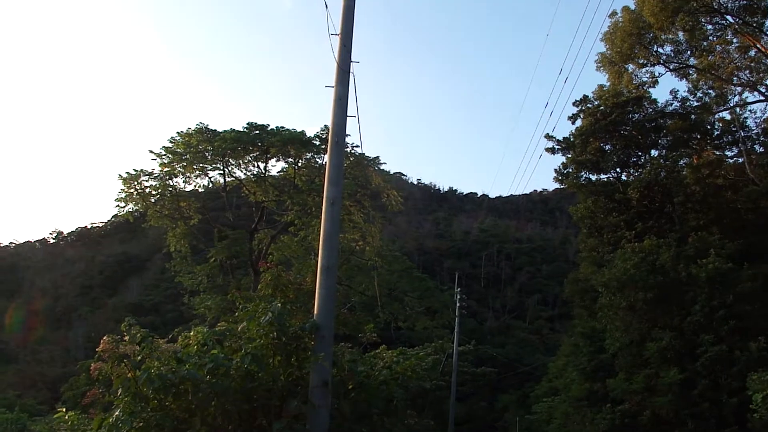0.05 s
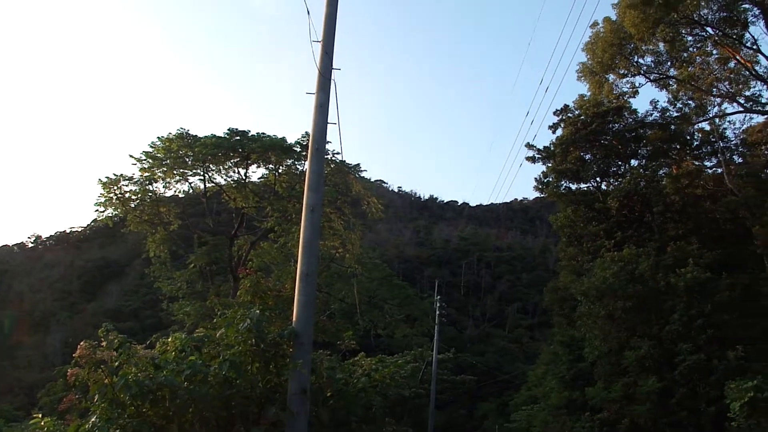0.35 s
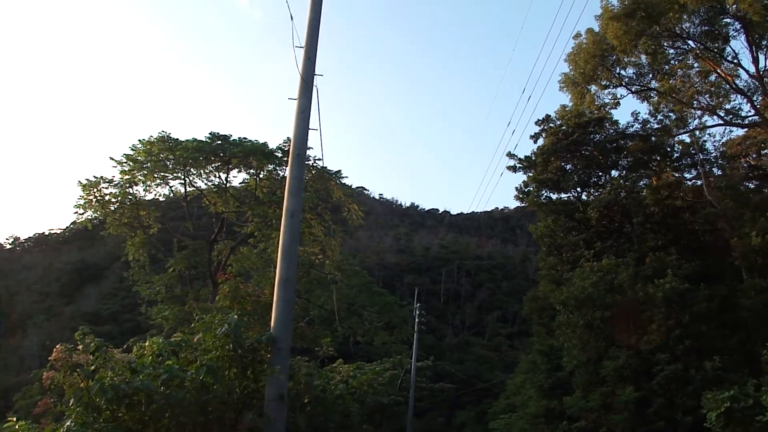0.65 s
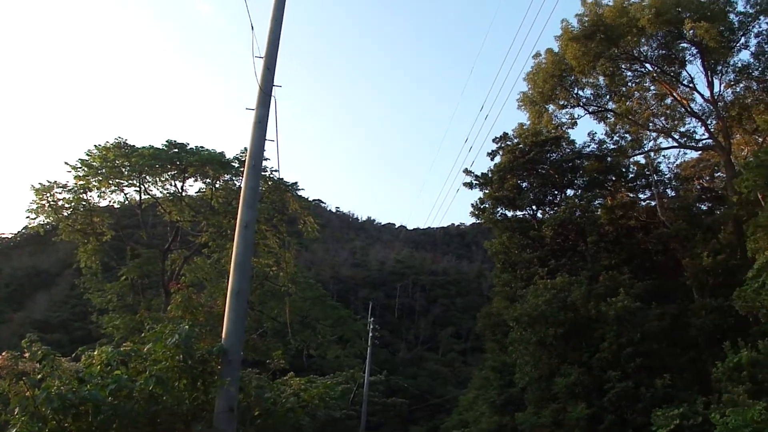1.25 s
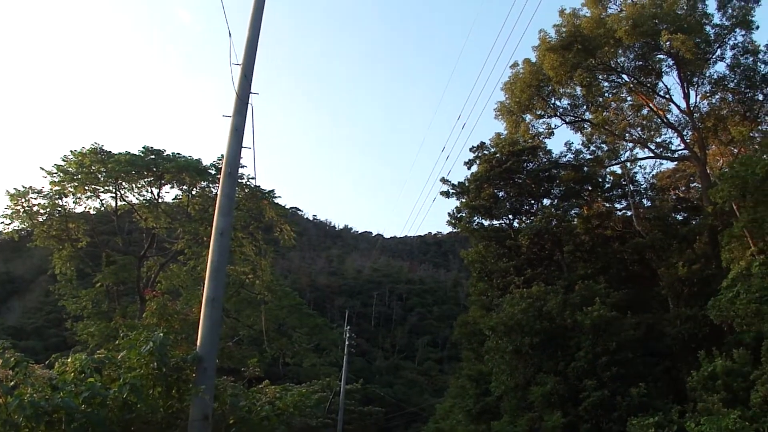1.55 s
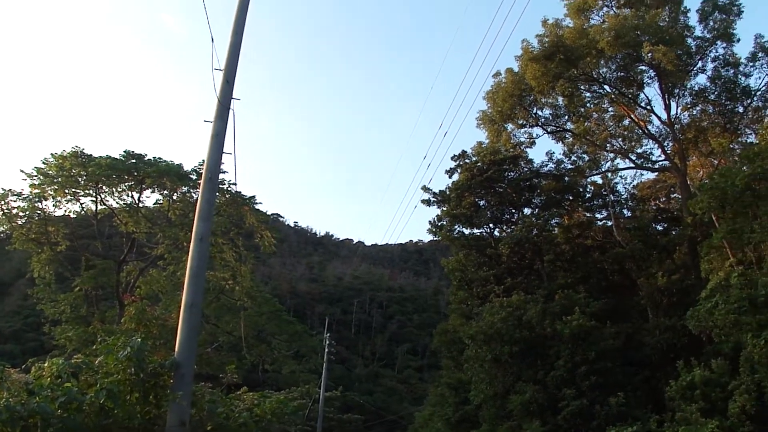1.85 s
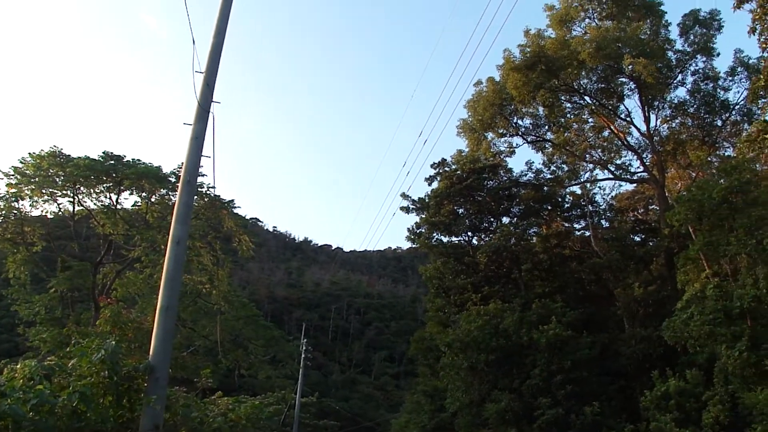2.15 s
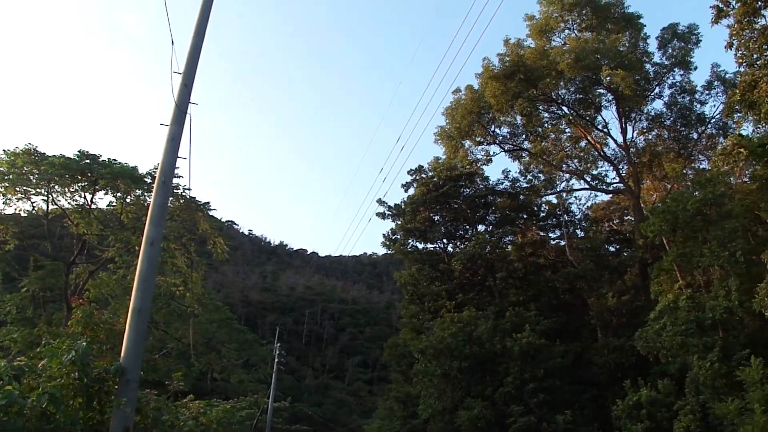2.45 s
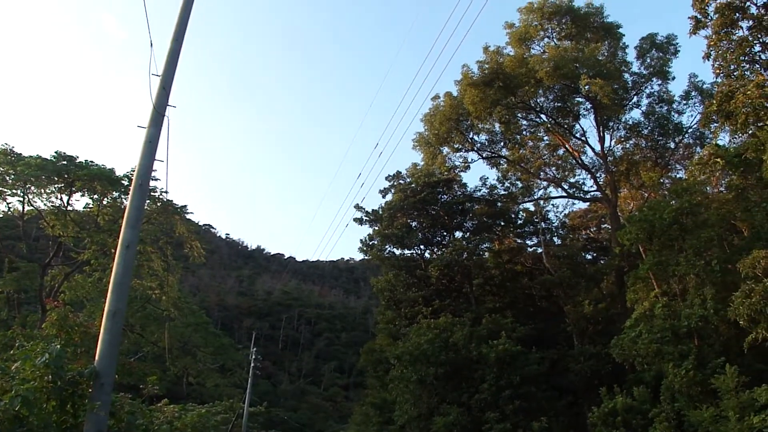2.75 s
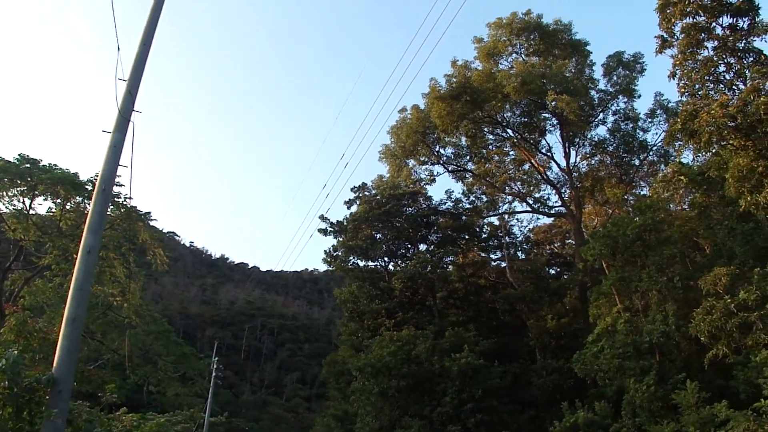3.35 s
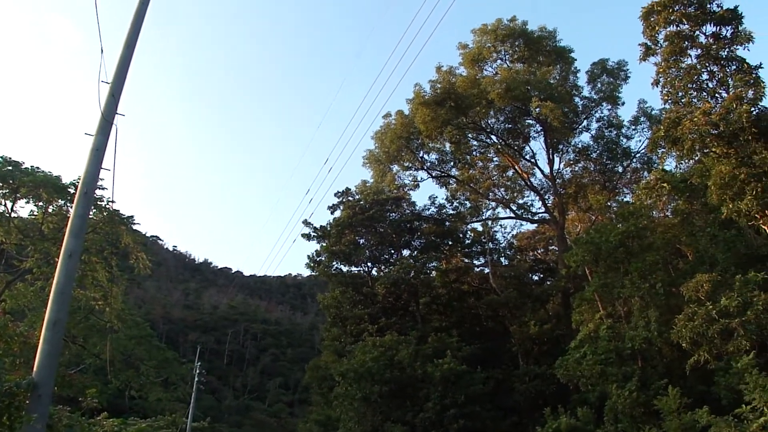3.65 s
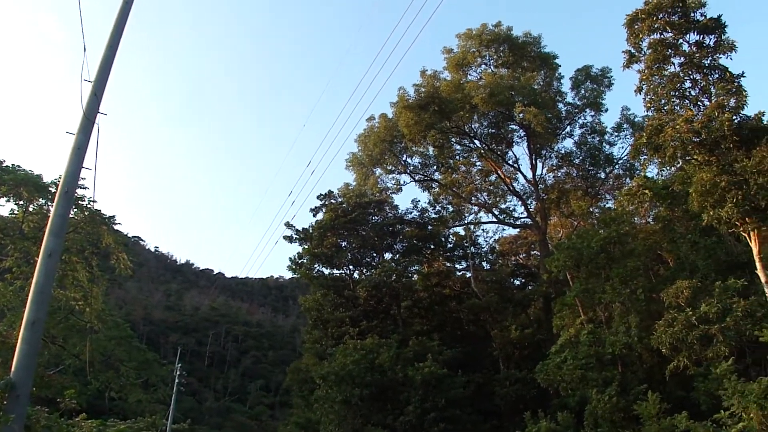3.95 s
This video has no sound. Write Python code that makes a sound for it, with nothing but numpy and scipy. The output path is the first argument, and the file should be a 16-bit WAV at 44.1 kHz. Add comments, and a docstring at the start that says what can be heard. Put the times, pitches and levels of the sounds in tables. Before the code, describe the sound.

A buzzard gives a sharp note, then a long whistled mew over crickets and distant crows.

```python
"""Wooded hillside. A buzzard gives a sharp note, then a long arched mew: a harmonic whistle that
breaks up on fast slides. Crows caw farther off, hoarse harmonics shaped by the throat. Crickets
chirp and trill by wing strokes; a small bird ticks; a far cicada swells once. Valley air and an
insect chorus lie beneath, with three small knocks close by. The trees scatter the bird calls and
the chirps. The microphone has three notches in the treble."""
import sys
import numpy as np
from scipy import signal
from scipy.fft import rfft, irfft
from scipy.io import wavfile

SR = 44100
rng = np.random.default_rng(int(sys.argv[2]) if len(sys.argv) > 2 else 0)


def transcribe(signal):
    """Save signal, clipped to [-1, 1], as a 16-bit WAV file at the path in sys.argv[1]."""
    frames = np.atleast_2d(signal).T
    limited = np.clip(frames, -1, 1)
    pcm = np.round(limited * 32767).astype(np.int16)
    wavfile.write(sys.argv[1], SR, pcm)


N = 4 * SR

# valley air: f/Hz, relative density/dB
AIR_SPECTRUM = [(15, -64), (25, -44), (65, -23), (196, -5), (418, 0), (489, -0.5), (707, -0.5),
                (1220, -2.5), (1700, -4), (2180, -7.5), (2600, -14), (3380, -35), (5720, -120)]
# far insect chorus: f/Hz, relative density/dB
CHORUS_SPECTRUM = [(2500, -15.5), (3500, -12.5), (4500, -1), (5400, -8), (6300, 0), (7300, -6), (8000, -4),
                   (9100, -1), (10000, -9), (10900, -13), (11600, -32.5)]
# chorus envelope: t/s, level/dB
CHORUS_ENVELOPE = [(0, -56), (1.6, -56), (4, -55)]
# near knocks: t/s, peak/dB, centre f/Hz, width/Hz
KNOCK_HITS = [(2.392, -64.5, 85, 70), (3.109, -34.5, 1340, 1280), (3.472, -33.5, 2180, 780)]
# trilling insects: f/Hz, stroke rate/Hz, half of the fall per stroke/Hz, level/dB
TRILL_VOICES = [(9130, 118, 400, -59.5), (9140, 112, 520, -65.5), (9110, 100, 380, -64.5),
                (8450, 77, 940, -69.5), (7360, 96, 780, -68)]
# cricket envelope: t/s, level/dB
CRICKET_ENVELOPE = [(0, -63.5), (.9, -63.5), (1.5, -60.5), (2.1, -58.5), (3, -60), (4, -59.5)]
# small bird, falling ticks: t/s, f/Hz, level/dB
BIRD_TICKS = [(.04, 6700, -54), (.44, 6680, -54.5), (.862, 6660, -53), (1.275, 6700, -55.5),
              (1.70, 6670, -53), (2.218, 6200, -55), (2.63, 6370, -60), (3.085, 6380, -55),
              (3.533, 6400, -58), (3.995, 6420, -52)]
# small bird, steady peeps: t/s, f/Hz, level/dB
BIRD_PEEPS = [(.385, 6220, -59), (.843, 6170, -61)]
# one caw before scaling: t/s, f/Hz, relative level/dB, roughness
CAW_CONTOUR = [(0, 298.8, -16, 0.58), (.035, 383.3, -3.5, 0.75), (.066, 443.8, 0, 0.06),
               (.088, 462.9, -4, 0.04), (.15, 433.9, 2, 0.03), (.19, 405.4, -2.5, 0.02),
               (.218, 372, 0.5, .4), (.25, 318, -8.5, 0.93), (.275, 286, -19, 1.1)]
# caws: start t/s, level/dB, time factor, pitch factor, formant factor
CAW_EVENTS = [(2.41, -48.5, 1.016, .999, 1.002), (3.386, -48, 0.92, 1.005, 0.99),
              (3.756, -57, .87, 1.04, 1.054)]
# crow throat: f/Hz, gain/dB
CROW_FORMANTS = [(300, -37), (450, -14), (780, -14.5), (900, -3.5), (1000, -5), (1150, -12), (1300, 4),
                 (1550, 2.5), (1740, -0.5), (1830, -20), (2200, -16.5), (2800, -60), (4000, -57)]
# buzzard, sharp note: t/s, f/Hz, level/dB, relative level of harmonics 3-5/dB
NOTE_CONTOUR = [(2.412, 960, -55, -7), (2.426, 1267, -51.5, -9), (2.437, 1565, -53.5, -16),
                (2.452, 1794, -44.5, -17), (2.465, 1835, -41, -9), (2.48, 1763, -47.5, -10),
                (2.497, 1580, -49.5, -4), (2.52, 1345, -55.5, -10), (2.54, 1238, -57, -15),
                (2.566, 1218, -56.5, -7), (2.585, 1084, -56.5, -5), (2.615, 1070, -72, -11)]
# buzzard, mew: t/s, f/Hz, level/dB, relative level of harmonics 3-5/dB
MEW_CONTOUR = [(2.89, 1411, -82, -8), (2.96, 1345, -63, -14), (3.003, 1193, -68.5, -10),
               (3.022, 1228, -55.5, -10), (3.11, 1321, -55.5, -6), (3.152, 1430, -55.5, -4),
               (3.2, 1515, -55.5, -11.5), (3.295, 1571, -48.5, -9), (3.37, 1584, -53, -6),
               (3.47, 1596, -43.5, -13), (3.555, 1589, -49.5, -11), (3.615, 1555, -57.5, -8),
               (3.66, 1520, -54, -12), (3.69, 1470, -54, -8), (3.725, 1402, -51.5, -8),
               (3.752, 1385, -51.5, -20), (3.772, 1285, -57.5, -26), (3.797, 900, -62, -16)]
# buzzard, reedy lines halfway between harmonics: t/s, relative level/dB
SUBTONE_ENVELOPE = [(2.6, -24.5), (3.1, -27), (3.3, -23.5), (3.555, -24), (3.615, -6), (3.66, -20),
                    (3.7, -38)]
# buzzard call, tone colour: f/Hz, gain/dB
BUZZARD_TONE_COLOUR = [(1150, 0.5), (1600, 0.5), (1850, -6.5), (2400, 6.5), (3200, 7), (3650, 0.5),
                       (4100, 0.5), (4550, 5.5), (4780, -15), (5500, 7.5), (6300, -7.5), (7200, -11),
                       (7900, -3.5), (9000, -20)]
# microphone notches: f/Hz, width/Hz
MIC_NOTCHES = [(3000, 720), (4000, 2080), (5020, 1360)]

SIDE = np.array([[1], [-1]])  # left +, right -


def undb(db):
    """Decibels to gain."""
    return 10 ** (np.asarray(db) / 20)


def unit(x):
    """Scale to rms 1."""
    return x / np.sqrt(np.mean(x ** 2))


def clock():
    """Time in seconds."""
    return np.arange(N) / SR


def curve(rows, t):
    """Table columns, interpolated linearly over the first."""
    at, *columns = np.array(rows, float).T
    return [np.interp(t, at, c) for c in columns]


def gain_at(spectrum, hz):
    """Gain of an (f/Hz, level/dB) table, interpolated over log f."""
    f, db = np.array(spectrum, float).T
    return undb(np.interp(np.log(hz + 1), np.log(f), db))


def walk(rate_hz):
    """Smooth random wander, rms 1."""
    hz = np.arange(N // 2 + 1) * SR / N
    return unit(irfft(rfft(rng.standard_normal(N)) * np.exp(-(hz / rate_hz) ** 2), N))


def turn(hz):
    """Running phase in radians."""
    return 2 * np.pi * np.cumsum(hz) / SR


def gate(t, start_s, end_s, edge_s):
    """Window with linear edges."""
    return np.clip(np.minimum(t - start_s, end_s - t) / edge_s, 0, 1)


def wash(spectrum, correlation):
    """Stereo noise of given spectrum and left-right correlation."""
    hz = np.arange(N // 2 + 1) * SR / N
    low_cut = np.minimum(hz / spectrum[0][0], 1) ** 2
    high_cut = 1 / (1 + (hz / spectrum[-1][0]) ** 16)
    shape = gain_at(spectrum, hz) * low_cut * high_cut
    mid, side = (unit(irfft(rfft(rng.standard_normal(N)) * shape, N)) for _ in range(2))
    return (np.sqrt(1 + correlation) * mid + np.sqrt(1 - correlation) * side * SIDE) / np.sqrt(2)


def forest(x, wet_db, t60_s, side_db, build_s=.0028):
    """Direct sound plus a tail scattered by trunks and leaves."""
    t = clock()[:SR]
    envelope = np.exp(-np.log(1000) * t / t60_s) * (1 - np.exp(-t / build_s))
    tails = rng.standard_normal((2, SR)) * envelope
    mid, side = (signal.fftconvolve(x, h / np.linalg.norm(h))[:N] for h in tails)
    return x + undb(wet_db) * (mid + undb(side_db) * side * SIDE)


def valley_air(level_db=-52.5, right_bias_db=1.4):
    """Soft, wide rush, leaning right."""
    rush = wash(AIR_SPECTRUM, correlation=-.36)
    return rush * undb(level_db + .22 * walk(4.9) - SIDE * right_bias_db / 2)


def chorus():
    """Far insects, merged into a hiss."""
    return wash(CHORUS_SPECTRUM, correlation=.14) * undb(curve(CHORUS_ENVELOPE, clock())[0])


def cicada(centre_hz=4500, skirt_hz=960, level_db=-57, peak_s=1.63, swell_s=.13):
    """Far, narrow hiss; swells once and dies away."""
    swell = np.exp(-((clock() - peak_s) / swell_s) ** 2)
    band = [(centre_hz - skirt_hz, -40), (centre_hz, 0), (centre_hz + skirt_hz, -40)]
    return wash(band, correlation=.14) * undb(level_db) * swell


def knocks():
    """Dead bumps and clicks: band-passed impulses."""
    out = 0
    for at_s, peak_db, hz, width_hz in KNOCK_HITS:
        edges_hz = [hz - width_hz / 2, hz + width_hz / 2]
        band = signal.butter(3, edges_hz, "bandpass", fs=SR, output="sos")
        ring = signal.sosfilt(band, signal.unit_impulse(N, int(at_s * SR)))
        out = out + undb(peak_db) * ring / np.abs(ring).max()
    return out


def wing_strokes(hz, rate_hz, half_fall_hz, scatter_hz):
    """Pulse train; each stroke is a short tone that swells and falls in pitch."""
    cycle = np.cumsum(rate_hz * (1 + .025 * walk(4))) / SR % 1
    pitch_hz = hz + half_fall_hz * (1 - 2 * cycle) + scatter_hz * walk(600)
    return unit(np.sin(np.pi * cycle) ** 4 * np.sin(turn(pitch_hz)))


def trills(flank_db=-1.5):
    """Unbroken wing strokes, ahead and to both sides."""
    def group():
        return sum(undb(db + walk(5.8)) * wing_strokes(hz, rate_hz, half_fall_hz, scatter_hz=230.1)
                   for hz, rate_hz, half_fall_hz, db in TRILL_VOICES)

    ahead, left, right = group(), group(), group()
    return ahead + undb(flank_db) * np.array([left, right])


def cricket(pitch_hz=6553, wander_hz=24, start_s=.05, period_s=.2306, duty=.84):
    """Wing strokes in even chirps."""
    t = clock()
    chirps = gate((t - start_s) % period_s, 0, duty * period_s, edge_s=.0062)
    hz = pitch_hz + wander_hz * walk(14.1)
    strokes = wing_strokes(hz, rate_hz=84.3, half_fall_hz=114, scatter_hz=84.5)
    song = strokes * chirps * undb(curve(CRICKET_ENVELOPE, t)[0])
    return forest(song, wet_db=-3.5, t60_s=.052, side_db=-2)


def small_bird(sigma_s=.0064, tick_fall_hz_per_s=13000):
    """Gaussian tone pips: thin falling ticks, softer steady peeps."""
    out = 0
    for notes, fall_hz_per_s in ((BIRD_TICKS, tick_fall_hz_per_s), (BIRD_PEEPS, 0)):
        for at_s, hz, db in notes:
            t = clock() - at_s
            envelope = np.sqrt(2) * undb(db) * np.exp(-.5 * (t / sigma_s) ** 2)
            out = out + envelope * np.sin(2 * np.pi * t * (hz - fall_hz_per_s * t / 2))
    return forest(out, wet_db=-18, t60_s=.24, side_db=0)


def crows(jitter=.034):
    """Arched caws: harmonics through each bird's throat, hoarse at both ends."""
    out = 0
    for start_s, level_db, stretch, pitch, throat in CAW_EVENTS:
        t = (clock() - start_s) / stretch
        hz, db, rough = curve(CAW_CONTOUR, t)
        hz = hz * pitch
        phase = turn(hz * (1 + jitter * rough * walk(290)))
        voice = sum(gain_at(CROW_FORMANTS, k * hz / throat) * np.sin(k * phase) for k in range(1, 9))
        rasp = 1 + rough * walk(88)
        envelope = np.sqrt(2) * undb(level_db + db) * gate(t, 0, CAW_CONTOUR[-1][0], edge_s=.0088)
        out = out + voice * rasp * envelope
    return forest(out, wet_db=-4.5, t60_s=1, side_db=-9)


def buzzard_call(contour, held_jitter=.0024, rough_jitter=.021, flutter_db=1.5, break_hz_per_s=12500):
    """Whistle with bright and dull bands: rough on fast slides, reedy by period doubling."""
    t = clock()
    hz, db, overtone_db = curve(contour, t)
    subtone_db = curve(SUBTONE_ENVELOPE, t)[0]
    rough = np.clip(np.abs(np.gradient(hz, t)) / break_hz_per_s, 0, 1)
    phase = turn(hz * (1 + held_jitter * walk(88) + rough_jitter * rough * walk(330)))

    def partial(k, level_db):
        gain = gain_at(BUZZARD_TONE_COLOUR, k * hz) * undb(level_db + flutter_db * walk(22))
        return gain * np.sin(k * phase)

    overtones = sum(partial(k, overtone_db) * (1 + .3 * walk(65)) for k in (3, 4, 5))
    subtones = sum(partial(k, subtone_db) for k in (1.5, 2.5, 3.5))
    voice = partial(1, 0) + partial(2, 0) + overtones + subtones
    rasp = 1 + .44 * rough * walk(175)
    envelope = np.sqrt(2) * undb(db) * gate(t, contour[0][0], contour[-1][0], edge_s=.018)
    return voice * rasp * envelope


def buzzard():
    """Sharp note, then the mew, scattered by the trees."""
    calls = buzzard_call(NOTE_CONTOUR) + buzzard_call(MEW_CONTOUR)
    return forest(calls, wet_db=-6, t60_s=.57, side_db=-4, build_s=.006)


def scene():
    """Birds, insects and knocks over the valley air."""
    air = valley_air()
    birds = buzzard() + crows() + small_bird()
    insects = cricket() + trills() + chorus() + cicada()
    return air + knocks() + insects + birds


def record(dry, cutoff_hz=11300):
    """Microphone: three treble notches, steep low-pass."""
    for hz, width_hz in MIC_NOTCHES:
        dry = signal.lfilter(*signal.iirnotch(hz, hz / width_hz, fs=SR), dry)
    return signal.sosfilt(signal.ellip(8, .2, 70, cutoff_hz, fs=SR, output="sos"), dry)


dry = scene()
out = record(dry)
transcribe(out)
```